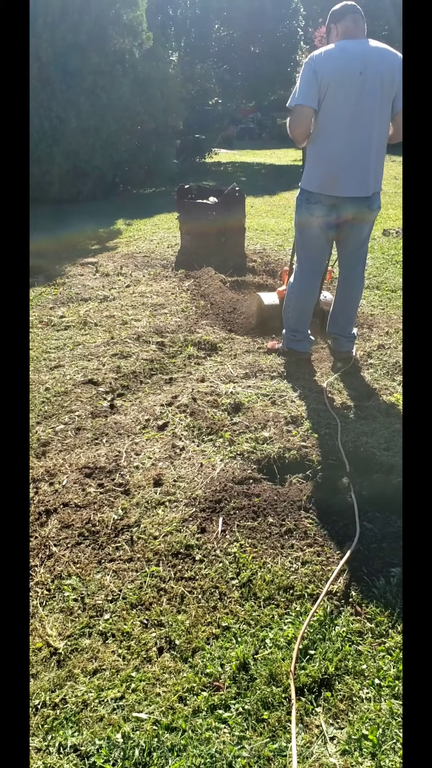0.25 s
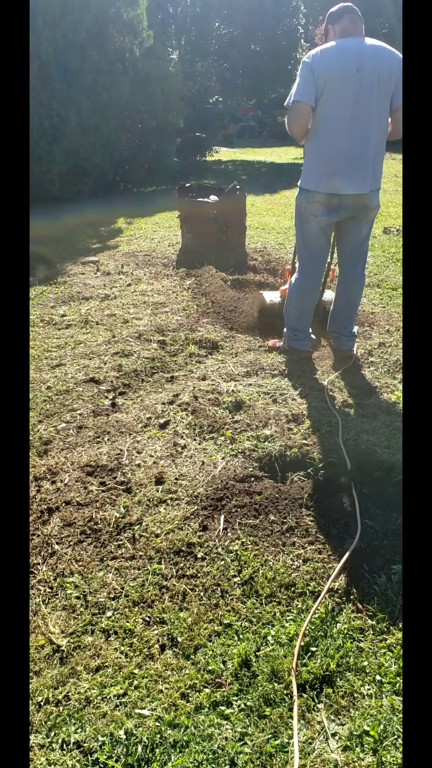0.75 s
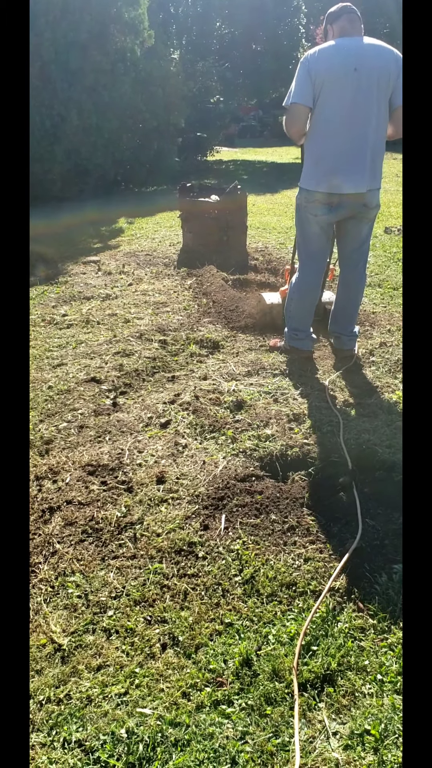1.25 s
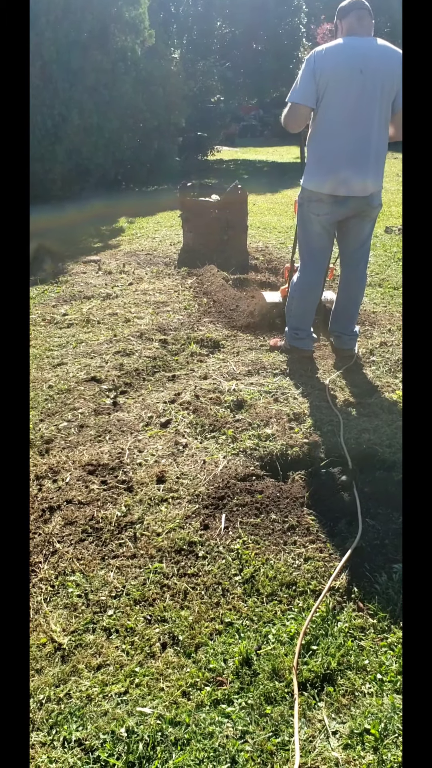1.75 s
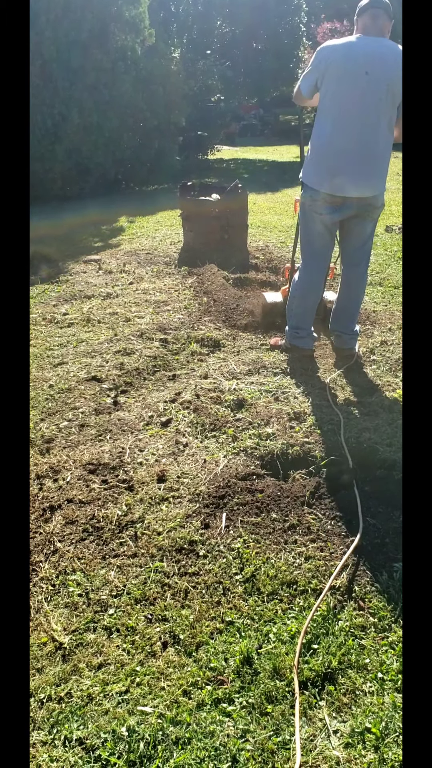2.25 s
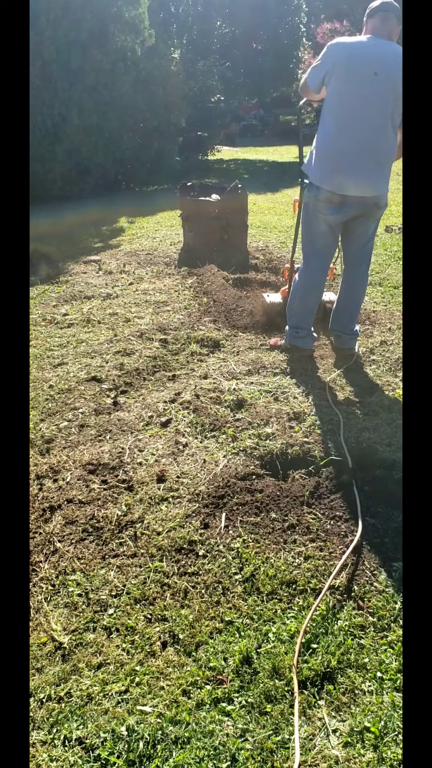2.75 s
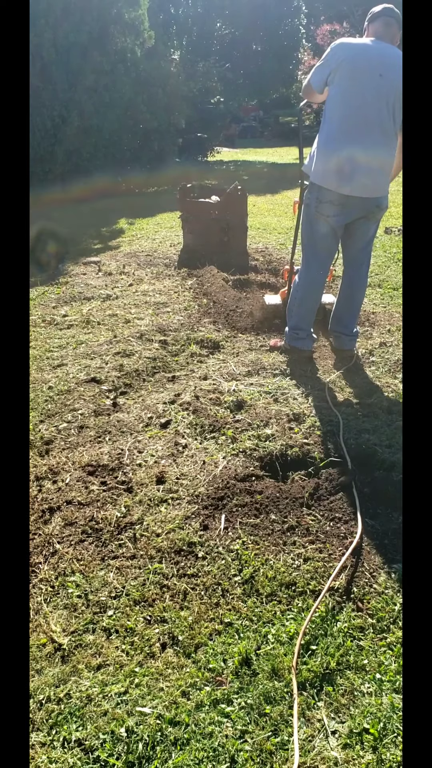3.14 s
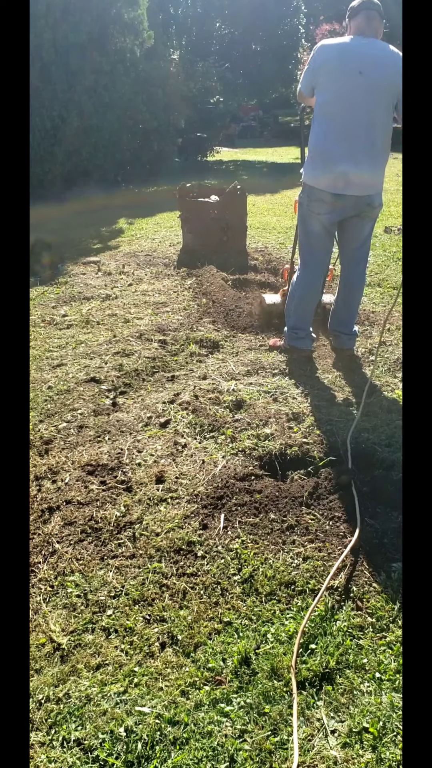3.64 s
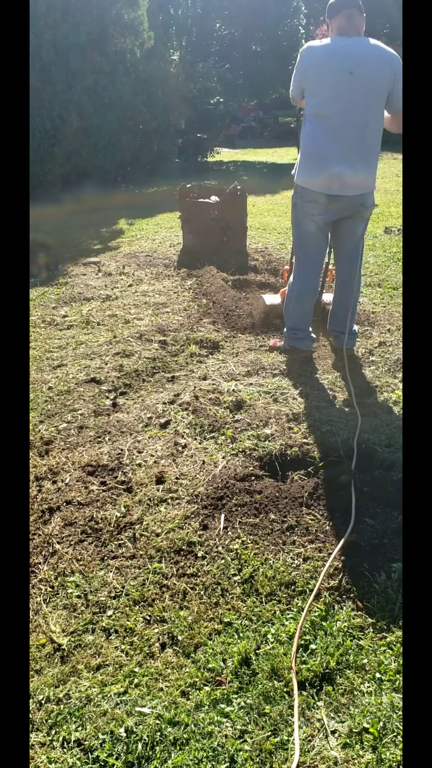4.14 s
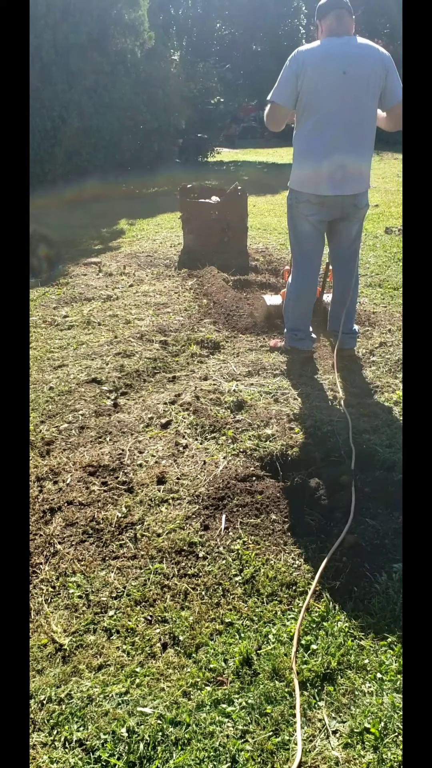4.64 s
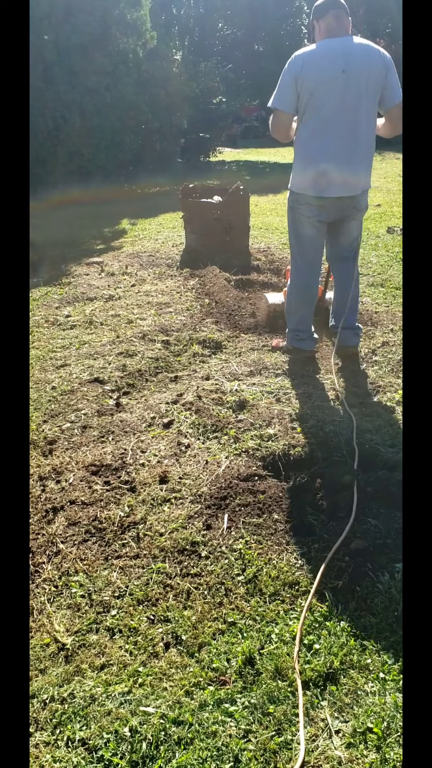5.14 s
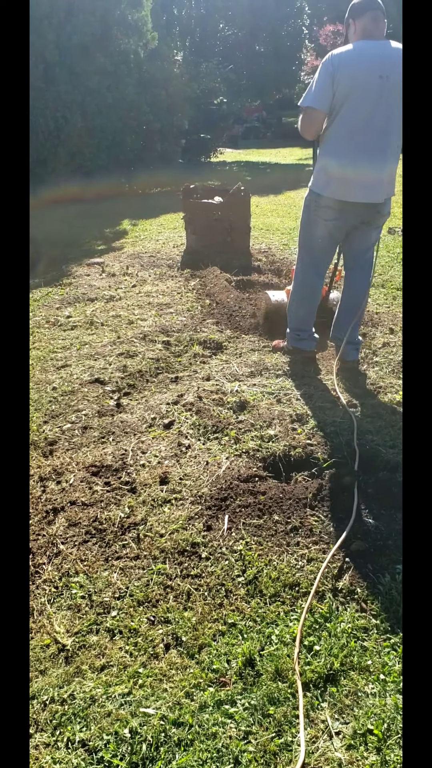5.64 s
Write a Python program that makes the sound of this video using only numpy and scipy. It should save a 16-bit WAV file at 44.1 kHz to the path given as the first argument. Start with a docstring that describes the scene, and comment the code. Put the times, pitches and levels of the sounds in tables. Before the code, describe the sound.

An electric tiller runs a few metres away on a lawn, its motor humming under a high whine and a rush of air, gears and churned soil. The rush swells early, and a stone clicks sharply on the tines. Clods thump the hood now and then. The pitch sags slightly, climbs later, and drops again after a last thump. A faint engine drones in the distance.

```python
"""A corded electric tiller churns a lawn a few metres away, heard with reflections at two microphone ports.
From the start its motor hums at shaft speed and whines at the fan blades over air, gears, soil and rumble.
A far engine drones until 0.6 s, the rush swells, stones tick on the tines and a clod thumps the hood.
Near 2 s the motor sags in harder soil; the far engine is back from 1.7 to 5.4 s. A clod lands at 3.4 s,
then the motor speeds up. After 5 s come two more stones and two clods, and the motor sags again."""
import sys
import numpy as np
from scipy import signal
from scipy.fft import rfft, irfft, next_fast_len
from scipy.io import wavfile
from scipy.ndimage import uniform_filter1d

SR = 44100
rng = np.random.default_rng(int(sys.argv[2]) if len(sys.argv) > 2 else 0)


def wav_record(signal):
    """Record a signal, one row per channel, as 16-bit PCM in the file named by sys.argv[1]."""
    frames = np.transpose(np.atleast_2d(signal))
    bounded = np.clip(frames, -1, 1)
    # unit amplitude maps onto the largest positive 16-bit level
    quanta = np.round(bounded * 32767).astype(np.int16)
    wavfile.write(sys.argv[1], SR, quanta)


N = 259749

# rumble envelope: t/s, level/dB
RUMBLE_LEVEL = [(0.0, -56), (.6, -50.5), (1.3, -49.5), (1.9, -53.5), (2.4, -57.5), (3.4, -49), (4.1, -58),
                (5.1, -50.5), (5.89, -50)]
# rumble spectrum: f/Hz, relative density/dB
RUMBLE_SPECTRUM = [(20, -42), (33, -30), (44, -0.5), (52, 4), (60, 5.5), (78, -7.5), (90, -4.5),
                   (130, -11.5), (180, -35.5)]
# far engine: start/s, end/s, f/Hz, level/dB, slope/(dB/s)
ENGINE_DRONES = [(-.1, 0.598, 131.5, -55.5, -12), (1.68, 3.178, 102.9, -50, -2),
                 (3.18, 4.266, 103, -54.5, 6), (4.25, 5.398, 103.4, -50, -9.5)]
# churning soil: f/Hz, relative density/dB
SOIL_SPECTRUM = [(100, -9.5), (150, -5.5), (200, 1.5), (330, 0), (430, -0.5), (640, 0), (900, -9.5),
                 (1300, -19.5), (2000, -36)]
# soil shield rings and dip: f/Hz, width/Hz, boost/dB
SHIELD_RINGS = [(640, 60, 3), (675, 20, 2), (700, 25, -3), (748, 30, 1), (1075, 40, 1.5)]
# cooling air: f/Hz, relative density/dB
AIR_SPECTRUM = [(700, -13), (1300, -9.5), (1700, -11.5), (2100, -5.5), (2500, -2.5), (3100, 3),
                (4000, -3.5), (5200, -5.5), (5800, -9.5), (6800, -11), (7600, -25), (10300, -14.5),
                (12000, -10.5), (14400, -19.5)]
# housing resonances: f/Hz, width/Hz, boost/dB
HOUSING_RINGS = [(1690, 70, 3), (2510, 40, 2), (2820, 35, 3.5), (2895, 40, 3), (3160, 50, 2.5),
                 (3400, 130, 2), (3680, 40, 2.5), (3870, 30, 5), (3990, 35, 2), (4530, 90, 2.5),
                 (4860, 60, 2), (4980, 30, 2)]
# low end of the whine: t/s, boost/dB
LOW_WHINE_BOOST = [(0, 1.1), (2, 0.9), (3.4, 0.2), (4.1, 1.4), (4.8, 0.5), (5.3, -1), (5.89, -0.3)]
# stones on the tines: t/s, level/dB, t60/s, crack/ring ratio
STONE_HITS = [(.2214, -43, .03, 1.5), (.9081, -28.5, .038, .7), (1.5294, -44, .03, 1.5),
              (5.1038, -40, .04, 3), (5.2194, -38, .025, .4)]
# tine modes: f/Hz, relative level/dB
TINE_MODES = [(1550, -10), (2690, -6), (3460, -1), (4620, -5), (5600, -10), (6270, -11), (11800, -13)]
# clods on the hood: t/s, level/dB, t60/s, crack/ring ratio
CLOD_HITS = [(1.075, -33, .07, .15), (3.384, -32, .07, .15), (5.112, -28, .12, .1), (5.711, -22, .06, .2)]
# hood modes: f/Hz, relative level/dB
HOOD_MODES = [(190, -13), (262, -.1), (620, -17)]
# motor under load: t/s, shaft speed/Hz, hum/dB, second order/dB, blade whine/dB
MOTOR_RUN = [(0, 250.3, -44, -64, -63), (.4, 255.6, -51, -62, -64), (.66, 261, -57, -62, -65),
             (.78, 258.5, -43.5, -62, -66), (.9, 253, -44, -63, -64), (1.2, 248, -41, -63, -59),
             (1.75, 247.2, -40.5, -62, -58), (1.95, 241.6, -40, -64, -57), (2.18, 247, -41, -64, -59),
             (2.7, 250.4, -42, -63, -57), (3.2, 250.7, -42, -62, -56), (3.35, 249.2, -41.5, -62, -55),
             (3.9, 251.6, -43.5, -63, -57), (4.15, 259, -48.5, -59, -55), (4.4, 263.1, -48, -57, -54.5),
             (5.08, 264.4, -47, -52, -54), (5.16, 263.5, -50, -51, -54), (5.6, 269.7, -50, -53, -52),
             (5.68, 269.2, -47, -53, -54), (5.76, 262, -46, -54, -63), (5.89, 257, -46.5, -56, -67)]
# reflections heard around 3.3 kHz, a list per port: delay/ms, gain
UPPER_ECHOES = [
    [(1.52, 0.017), (1.81, 0.12), (3.54, -0.059), (6.8, 0.073), (11.26, -0.057), (13.14, 0.099)],
    [(1.11, 0.18), (2.19, 0.0087), (3.52, 0.061), (4.88, -0.0083), (7.43, 0.053), (11.03, 0.15)],
]
# mid-band echoes, a list per port: delay/ms, gain
MID_ECHOES = [
    [(9.59, .09), (11.09, .17), (11.6, -.19)],
    [(4.36, -.14), (7.01, .11), (11.3, -.12), (11.92, .19)],
]
# diffuse scatter: f/Hz, level re direct/dB
SCATTER_SPECTRUM = [(60, -14.5), (500, -14.5), (1500, -4), (4000, -7), (6500, -1.5), (8000, 21), (11500, 2),
                    (14000, 30)]
# left and right tone colour; the left channel also falls silent between 8 and 9.5 kHz: f/Hz, left/dB, right/dB
TONE_COLOUR = [(102, 2.5, 1), (283, -0.5, 1.5), (399, -2, -4.5), (975, 9, 11), (1550, 12, 12),
               (2430, 4.5, 4.5), (2940, 4, 3.5), (4860, 4.5, 10), (5740, 5, 1), (6340, 9.5, 3.5),
               (7060, -6.5, 6.5), (7540, -12, 12), (8100, -52, -12.5), (8870, -56, 4), (8960, -58, -5.5),
               (9480, -60, 2.5), (9600, -18, 4.5), (10130, -6.5, 6), (12300, -4, 5.5), (14900, -19, 4)]
# peaks and dips on the way to each port: f/Hz, width/Hz, left/dB, right/dB
PATH_RIPPLE = [(800, 30, -5, -2), (910, 50, 2, 2), (870, 40, -3, -1), (955, 30, -3, -3), (1230, 40, -3, -3),
               (1330, 120, -1, -5), (1690, 90, 1, 3), (1860, 100, 1, -5), (2100, 60, -1, -4),
               (2330, 70, -1, -5), (2510, 60, -1, 3), (2660, 35, -4, 0.1), (2710, 70, 3, -1),
               (2990, 70, -4, 3), (3270, 150, 2, -3), (3570, 60, -1, -3), (3790, 50, -2, -2),
               (3870, 45, -1, 5), (3930, 30, -1, -2), (4000, 70, 4, -1), (4070, 60, 0.1, -4),
               (4150, 40, 3, -1), (4185, 30, -5, -1), (4400, 60, 1, -3), (4660, 70, -4, 3),
               (4740, 40, 2, -3), (4850, 50, 3, -1), (4980, 50, -1, 4), (5200, 80, -5, -1),
               (5290, 50, 3, 1), (5415, 60, -3, -3), (5500, 250, 4, -1), (5720, 120, -4, -4),
               (6000, 150, 4, 2), (6380, 200, -7, 2), (6700, 150, -1, -6)]

NO_LOAD_HZ, FAN_BLADES = 270, 20
SWELL_START_S, SWELL_LENGTH_S, SWELL_DB = 0.5, 0.66, 3


def amp(db):
    return 10 ** (np.asarray(db) / 20)


def unit_rms(x):
    return x / np.sqrt(np.mean(x ** 2) + 1e-20)


def spectrum_db(hz, rows, column=1):
    """Table column interpolated over log frequency."""
    rows = np.array(rows)
    return np.interp(np.log(hz + 1), np.log(rows[:, 0] + 1), rows[:, column])


def curves(rows, t):
    """Table columns interpolated over time."""
    times, *columns = np.transpose(rows)
    return [np.interp(t, times, column) for column in columns]


def peaks_db(hz, rings):
    """Sum of resonance peaks, each f/Hz, width/Hz, boost/dB."""
    return sum(db / (1 + (2 * (hz - f) / width) ** 2) for f, width, db in rings)


def rolloff(ratio):
    """Weight: 1 at ratio 0, half at 1, then a fourth-power fall."""
    return 1 / (1 + ratio ** 4)


def swell(t):
    """Ramp: 0 before the rush swells, 1 after."""
    return np.clip((t - SWELL_START_S) / SWELL_LENGTH_S, 0, 1)


def wander(samples):
    """Slow random drift, rms 1."""
    return unit_rms(uniform_filter1d(uniform_filter1d(rng.standard_normal(N), samples), samples))


def shaped_noise(shape_db, patch_db, fft_size):
    """Random short-time spectra shaped by shape_db(t, hz), with drifting patches; rms 1."""
    hop = fft_size // 4
    frames, hz = N // hop + 5, np.fft.rfftfreq(fft_size, 1 / SR)
    real, imag, patches = rng.standard_normal((frames, len(hz), 3)).T
    patches = unit_rms(uniform_filter1d(uniform_filter1d(patches, 10, 0), 10, 1))
    gain = amp(shape_db(np.arange(frames) * hop / SR, hz[:, None]) + patch_db * patches)
    _, noise = signal.istft((real + 1j * imag) * gain, nperseg=fft_size, noverlap=fft_size - hop)
    return unit_rms(noise[:N])


def rumble(t):
    """Low noise, slowly rising and falling."""
    noise = shaped_noise(lambda s, hz: spectrum_db(hz, RUMBLE_SPECTRUM), patch_db=3.4, fft_size=4096)
    return amp(curves(RUMBLE_LEVEL, t)[0]) * noise


def far_engine(t, fade_s=0.067):
    """A distant drone: one low sine per stretch, fading in and out."""
    out = np.zeros(N)
    for start, end, hz, db, db_per_s in ENGINE_DRONES:
        fade = np.clip(np.minimum(t - start, end - t) / fade_s, 0, 1)
        level = amp(db + db_per_s * np.clip(t - start, 0, end - start))
        out += np.sqrt(2) * level * fade * np.sin(2 * np.pi * hz * t)
    return out


def soil(t, base_db=-43.5, rise_db_per_s=0.4646, lows_hz=285, lows_db_per_hz=0.22):
    """Churning soil rings the shield; its lows grow as the motor sags."""
    def shape_db(s, hz):
        sag_hz = NO_LOAD_HZ - curves(MOTOR_RUN, s)[0]
        lows_db = lows_db_per_hz * sag_hz * rolloff(hz / lows_hz)
        return spectrum_db(hz, SOIL_SPECTRUM) + peaks_db(hz, SHIELD_RINGS) + lows_db
    return amp(base_db + rise_db_per_s * t) * shaped_noise(shape_db, patch_db=1.0, fft_size=2048)


def housing_db(t, hz, step_s=0.4, drift_hz=7, waver_db=1.6):
    """Housing rings drift and waver; the motor cover rings harder early on."""
    knots = np.arange(0, t[-1] + step_s, step_s)
    rings = []
    for f, width, db in HOUSING_RINGS:
        drift, waver = (np.interp(t, knots, row) for row in rng.standard_normal((2, len(knots))))
        rings.append((f + drift_hz * drift, width, db + waver_db * waver))
    cover = (4280, 100, 3 + np.interp(t, (0.8, 1.35), (6.5, 0)))
    return peaks_db(hz, rings + [cover])


def gears_db(t, hz, mesh_order=17.3, band_order=19.1, half_width_hz=900, db_per_hz=-0.0884):
    """A fuzzy mesh whine and a broad gear band track the shaft; the band weakens with sag."""
    shaft_hz = curves(MOTOR_RUN, t)[0]
    mesh_db = peaks_db(hz, [(mesh_order * shaft_hz, 200, 2.5)])
    band_db = 2.5 + db_per_hz * (NO_LOAD_HZ - shaft_hz) - 1.7 * (1 - swell(t))
    return mesh_db + band_db * rolloff((hz - band_order * shaft_hz) / half_width_hz)


def air_and_gears(t, base_db=-37.5, rise_db_per_s=0.1568, flicker_hz=8000):
    """Cooling air and gears sound through the housing; the middle fills in, the treble flickers."""
    def shape_db(s, hz):
        machine_db = spectrum_db(hz, AIR_SPECTRUM) + housing_db(s, hz) + gears_db(s, hz)
        middle = (2500, 440, 0.29 * s)
        low_whine = (2950, 900, curves(LOW_WHINE_BOOST, s)[0])
        flicker_db = 0.5 * np.interp(s, t, wander(samples=2500)) * rolloff(flicker_hz / (hz + 1))
        return machine_db + peaks_db(hz, [middle, low_whine]) + flicker_db
    level = amp(base_db + rise_db_per_s * t + 0.21 * wander(samples=1000))
    return level * shaped_noise(shape_db, patch_db=0.54, fft_size=2048)


def impacts(hits, modes, rise_s, crack_hz):
    """Each hit rings the struck part's modes, with a crack of low-passed noise."""
    out, t = np.zeros(N), np.arange(SR // 4) / SR
    for (start_s, db, t60_s, crack_ratio), phases in zip(hits, rng.random((len(hits), len(modes)))):
        ring = sum(amp(mode_db) * np.sin(2 * np.pi * (hz * t + phase))
                   for (hz, mode_db), phase in zip(modes, phases))
        crack = signal.lfilter(*signal.butter(2, crack_hz, fs=SR), rng.standard_normal(len(t)))
        envelope = amp(db - 60 * t / t60_s) * (1 - np.exp(-t / rise_s))
        hit = envelope * (unit_rms(ring) + crack_ratio * unit_rms(crack))
        slot = out[round(start_s * SR):][:len(t)]
        slot += hit[:len(slot)]
    return out


def motor(t, wobble_per_hz=0.00005, waver_db=1.1):
    """Four shaft orders and the fan blade whine; the speed wobbles more as load slows the shaft."""
    shaft_hz, hum_db, second_db, blade_db = curves(MOTOR_RUN, t)
    shaft_hz = uniform_filter1d(shaft_hz, size=2000)
    wobble = (0.00025 + wobble_per_hz * (NO_LOAD_HZ - shaft_hz)) * wander(samples=900)
    turns = np.cumsum(shaft_hz * (1 + wobble)) / SR
    orders = [(1, hum_db), (2, second_db), (3, -63), (4, second_db - 13), (FAN_BLADES, blade_db)]
    return np.sqrt(2) * sum(amp(db + waver_db * wander(samples=1200)) * np.sin(2 * np.pi * order * turns)
                            for order, db in orders)


def echo_response(hz, ports):
    """Sum of delayed copies at each port."""
    return np.array([sum(gain * np.exp(-2j * np.pi * hz * ms / 1000) for ms, gain in port)
                     for port in ports])


def scatter(x, hop=6000, t60_s=0.31):
    """Sound thrown back from all around; the machine keeps shifting, so each stretch gets a new tail."""
    t, out = np.arange(SR // 3) / SR, np.zeros((2, N + SR))
    window = np.sin(np.pi * np.arange(2 * hop) / (2 * hop))
    padded = np.pad(x, (hop, 2 * hop))
    for start in range(0, N + hop, hop):
        tails = rng.standard_normal((2, len(t))) * amp(-60 * t / t60_s)
        tails /= np.linalg.norm(tails, axis=1, keepdims=True)
        wet = signal.fftconvolve((padded[start:start + 2 * hop] * window)[None], tails, axes=1)
        out[:, start:start + wet.shape[1]] += wet
    return out[:, hop:hop + N]


def lawn(diffuse, clear, right_lag_ms=0.05):
    """Direct sound plus echoes off the ground and nearby things; only the diffuse part scatters."""
    size = next_fast_len(N + 4096)
    hz = np.fft.rfftfreq(size, 1 / SR)
    low_treble = rolloff((hz - 3300) / 2200)
    mid_band = rolloff(674 / (hz + 1)) * rolloff(hz / 2700)
    paths = 1 + low_treble * echo_response(hz, UPPER_ECHOES) + mid_band * echo_response(hz, MID_ECHOES)
    paths[1] *= np.exp(-2j * np.pi * hz * right_lag_ms / 1000)
    wet_gain = amp(spectrum_db(hz, SCATTER_SPECTRUM))
    mix = rfft(diffuse, size) * paths + wet_gain * rfft(scatter(diffuse), size)
    return irfft(mix / np.sqrt(1 + wet_gain ** 2) + rfft(clear, size) * paths, size)[:, :N]


def scene():
    """Tiller and background as they reach the two ports."""
    t = np.arange(N) / SR
    stones = impacts(STONE_HITS, TINE_MODES, rise_s=0.002, crack_hz=5500)
    clods = impacts(CLOD_HITS, HOOD_MODES, rise_s=0.008, crack_hz=900)
    rush = amp(SWELL_DB * (swell(t) - 1)) * (air_and_gears(t) + soil(t))
    return lawn(diffuse=rumble(t) + far_engine(t) + rush, clear=stones + clods + motor(t))


def record(dry, cutoff_hz=14550):
    """Left and right tone colour, and the left channel falls silent between 8 and 9.5 kHz; then the band limit."""
    size = next_fast_len(N + 4096)
    hz = np.fft.rfftfreq(size, 1 / SR)
    colour_db = [spectrum_db(hz, TONE_COLOUR, column) for column in (1, 2)]
    ripple_db = sum(np.outer(dbs, peaks_db(hz, [(f, width, 1)])) for f, width, *dbs in PATH_RIPPLE)
    coloured = irfft(rfft(dry, size) * amp(colour_db + ripple_db), size)[:, :N]
    lowpass = signal.firwin(1023, cutoff_hz, window=("kaiser", 9), fs=SR)
    return signal.oaconvolve(coloured, lowpass[None], "same")


dry = scene()
out = record(dry)
wav_record(out)
```